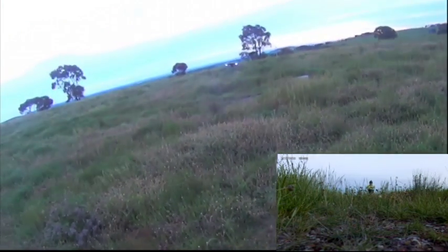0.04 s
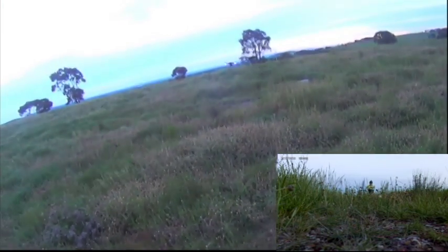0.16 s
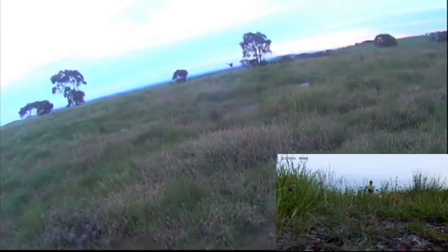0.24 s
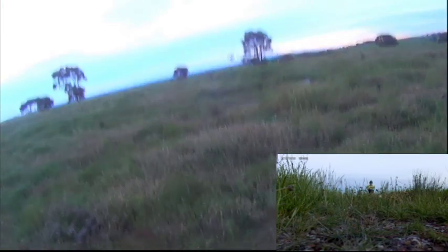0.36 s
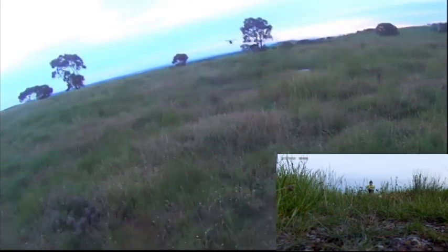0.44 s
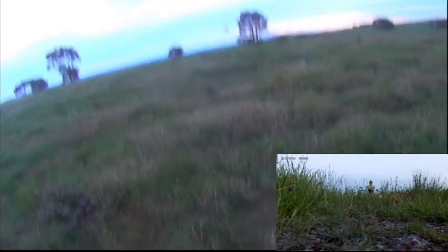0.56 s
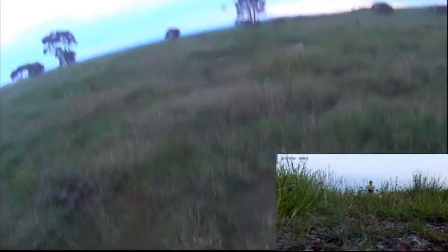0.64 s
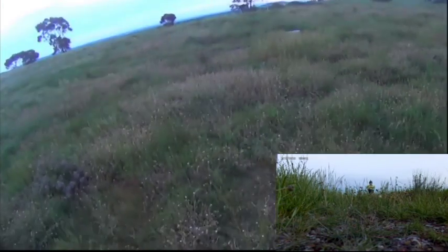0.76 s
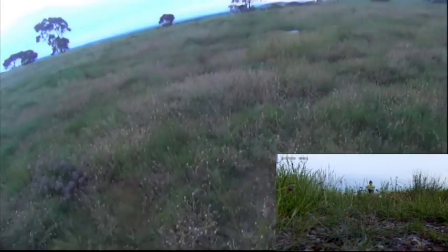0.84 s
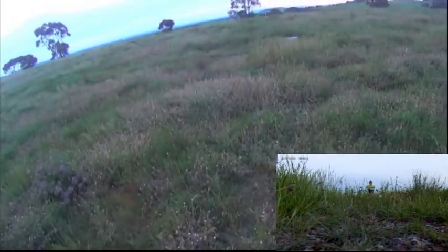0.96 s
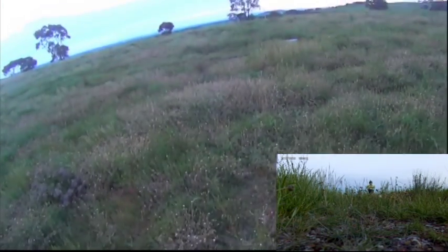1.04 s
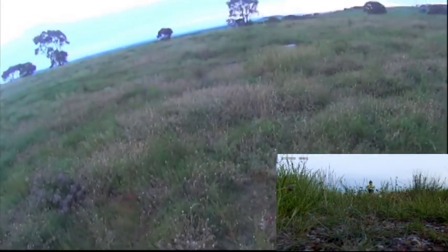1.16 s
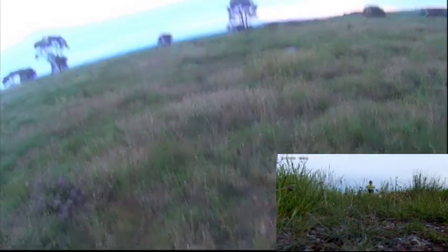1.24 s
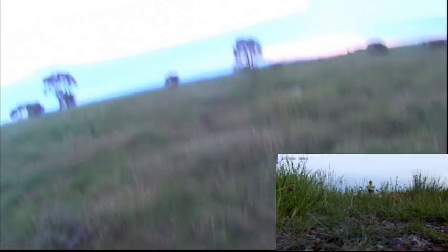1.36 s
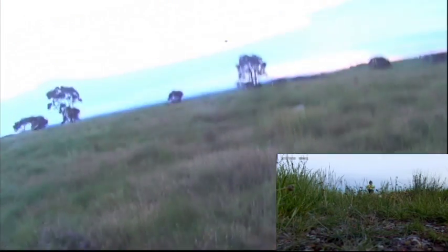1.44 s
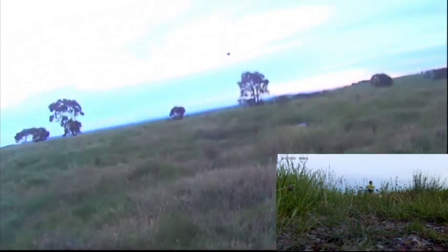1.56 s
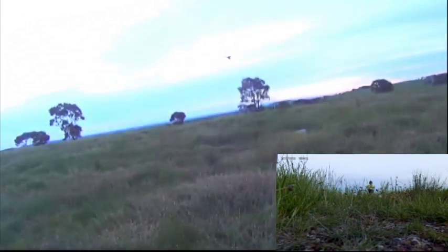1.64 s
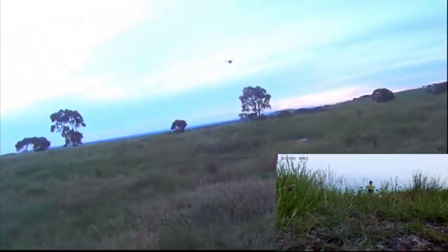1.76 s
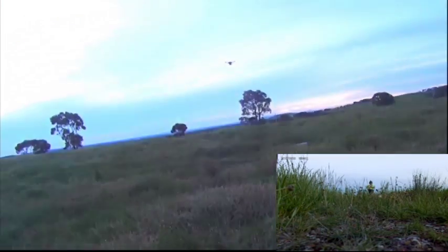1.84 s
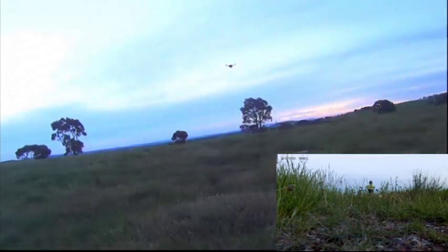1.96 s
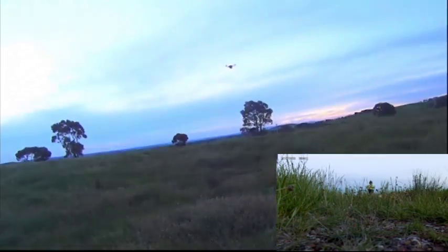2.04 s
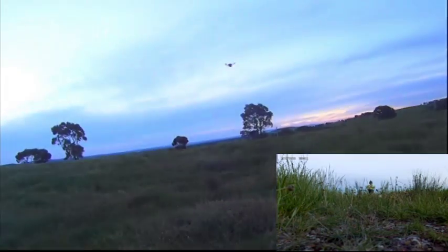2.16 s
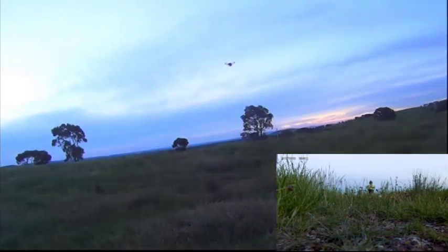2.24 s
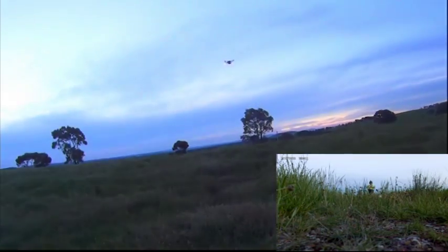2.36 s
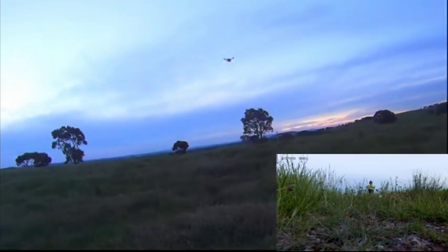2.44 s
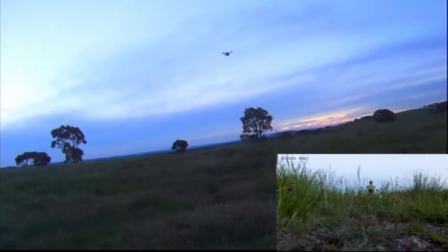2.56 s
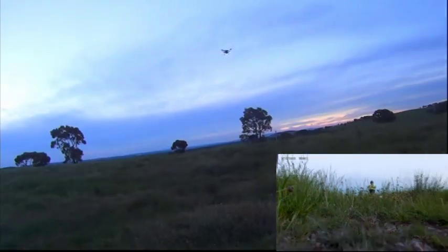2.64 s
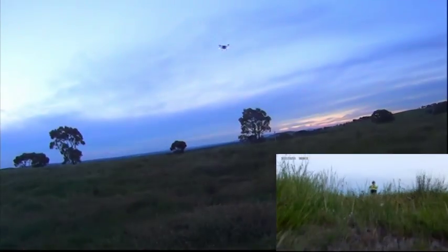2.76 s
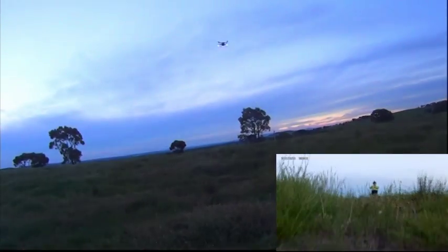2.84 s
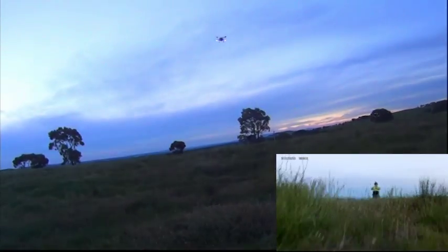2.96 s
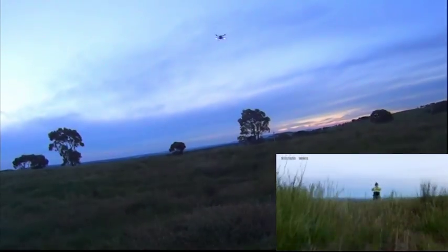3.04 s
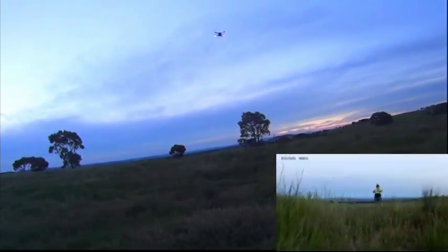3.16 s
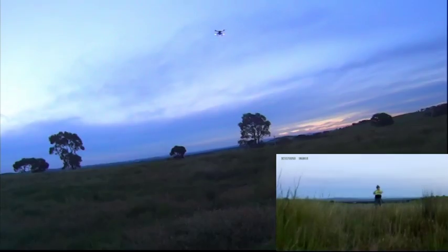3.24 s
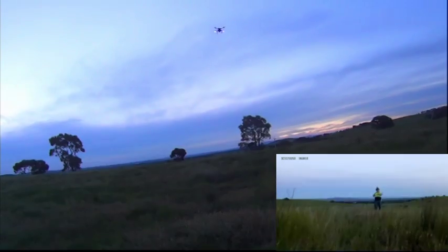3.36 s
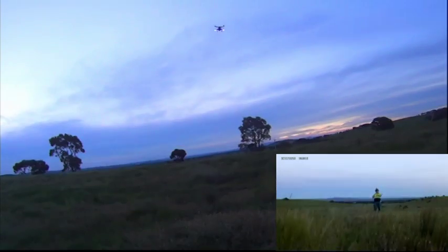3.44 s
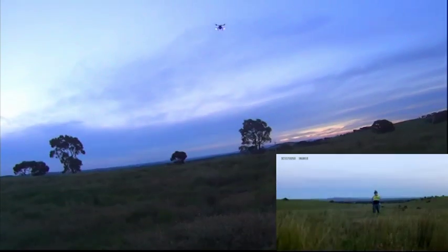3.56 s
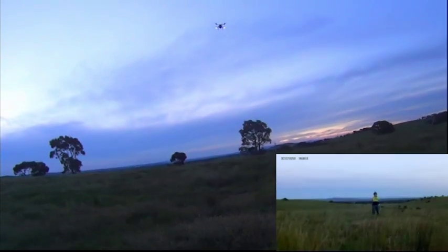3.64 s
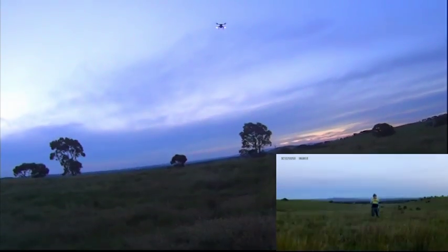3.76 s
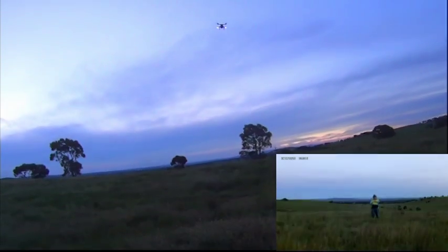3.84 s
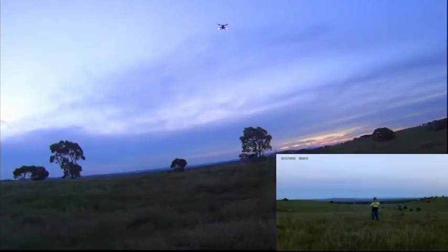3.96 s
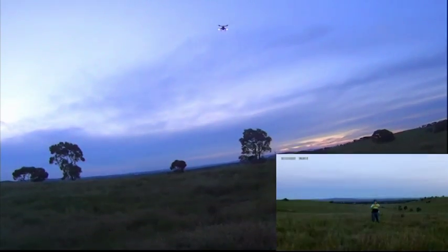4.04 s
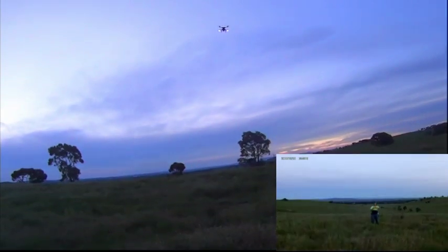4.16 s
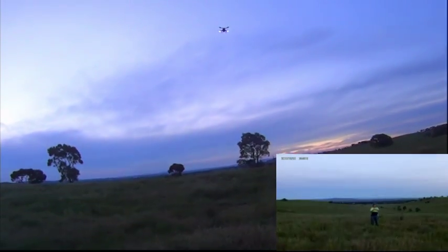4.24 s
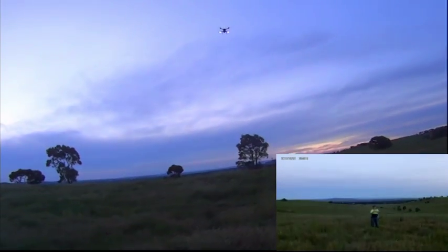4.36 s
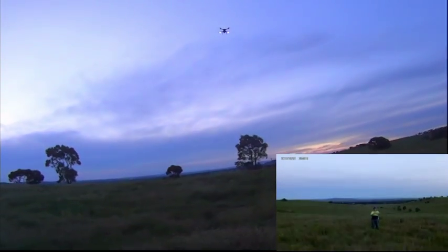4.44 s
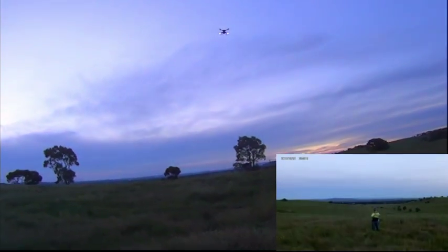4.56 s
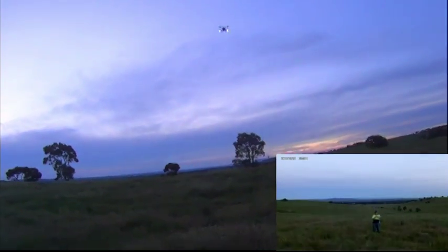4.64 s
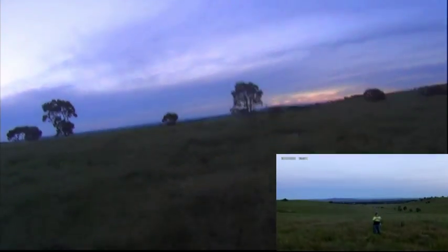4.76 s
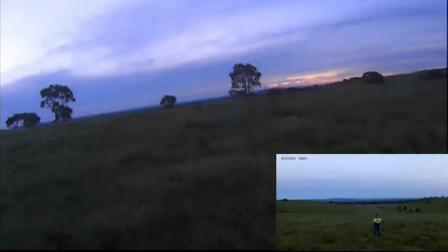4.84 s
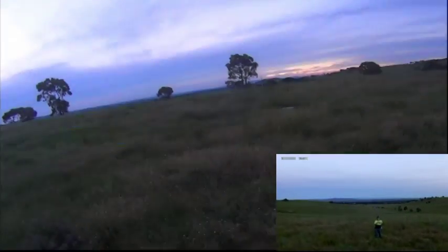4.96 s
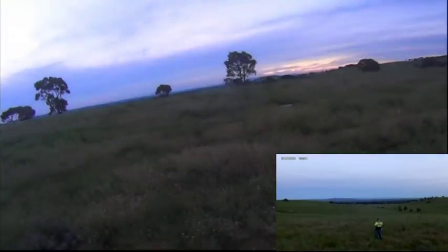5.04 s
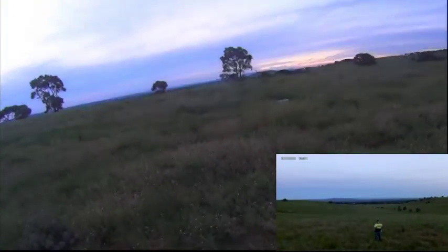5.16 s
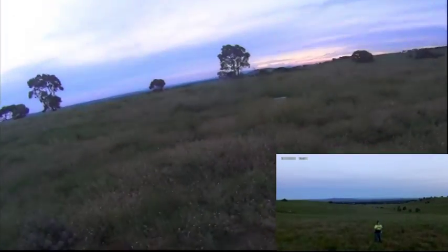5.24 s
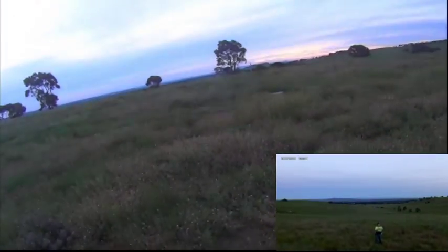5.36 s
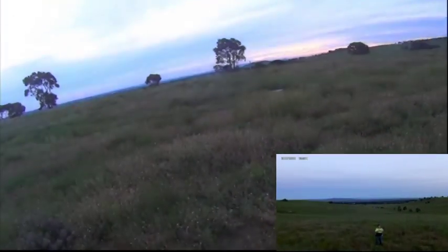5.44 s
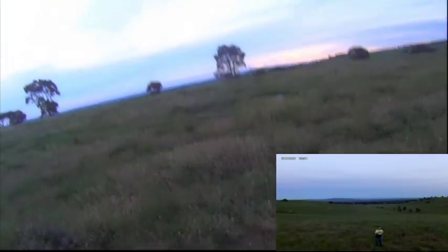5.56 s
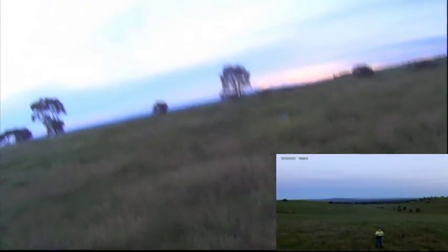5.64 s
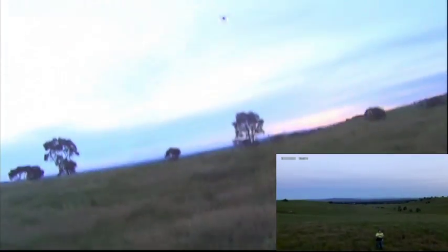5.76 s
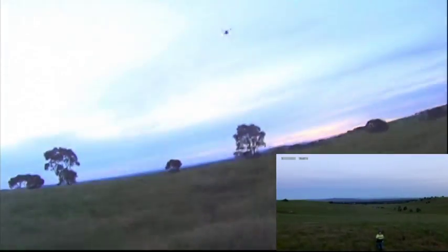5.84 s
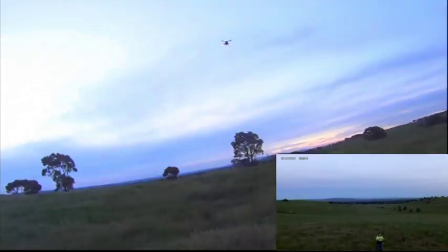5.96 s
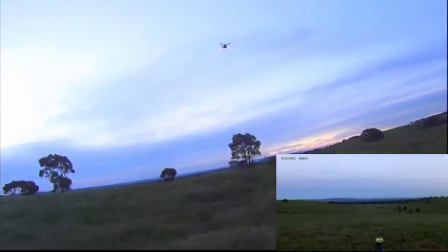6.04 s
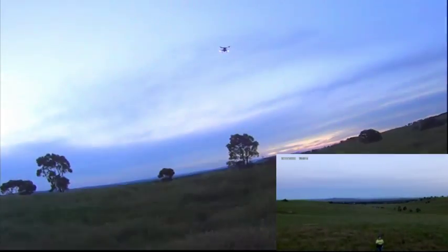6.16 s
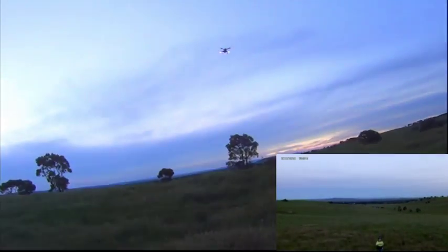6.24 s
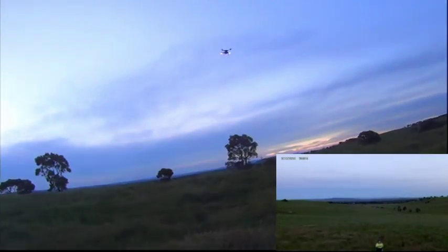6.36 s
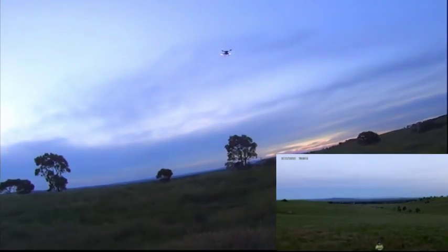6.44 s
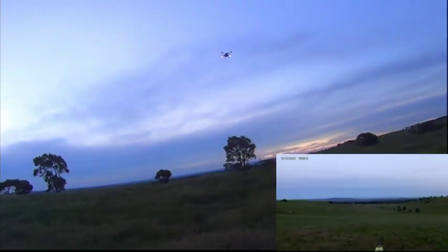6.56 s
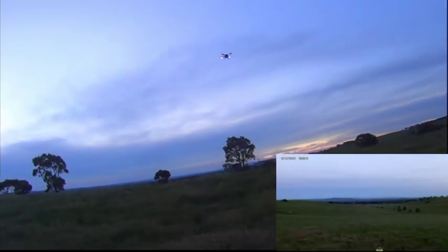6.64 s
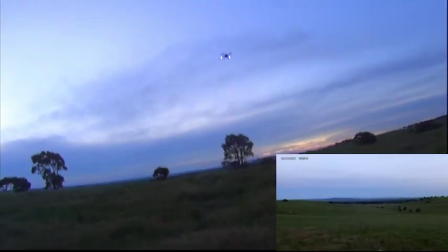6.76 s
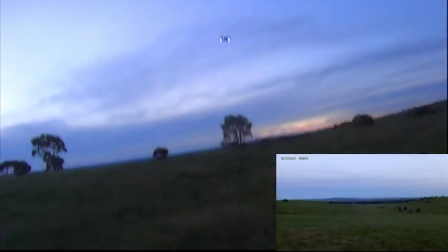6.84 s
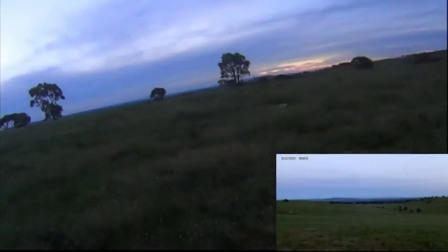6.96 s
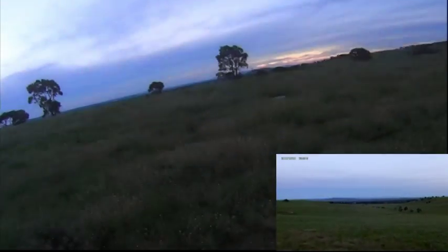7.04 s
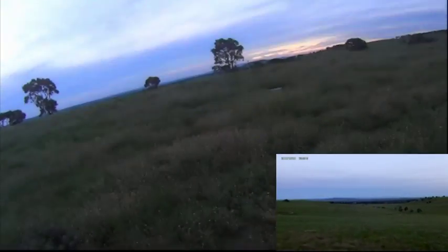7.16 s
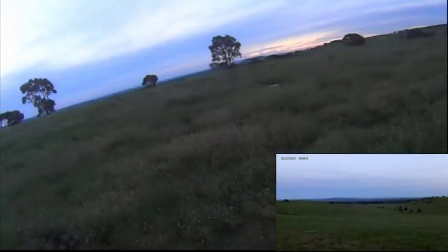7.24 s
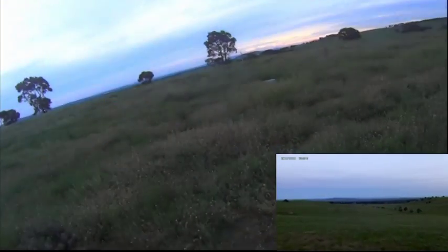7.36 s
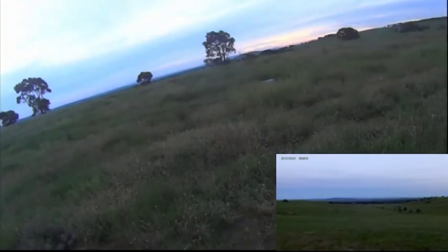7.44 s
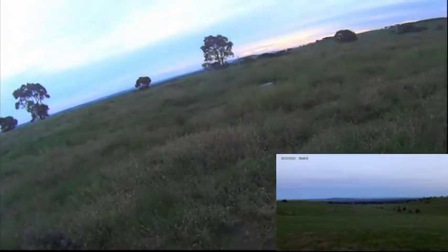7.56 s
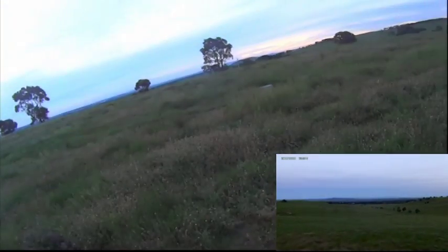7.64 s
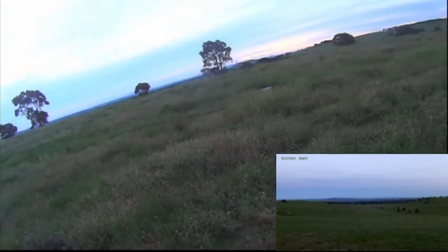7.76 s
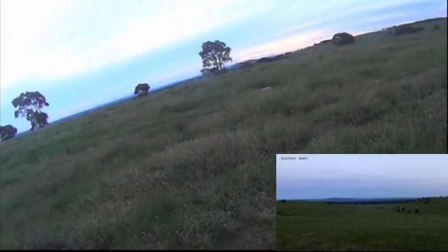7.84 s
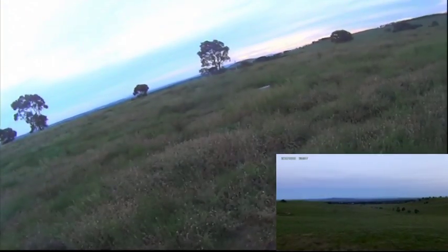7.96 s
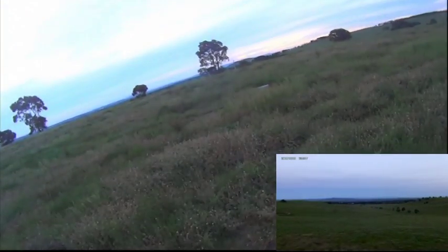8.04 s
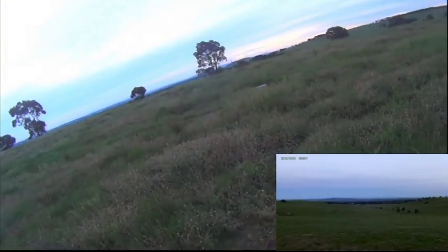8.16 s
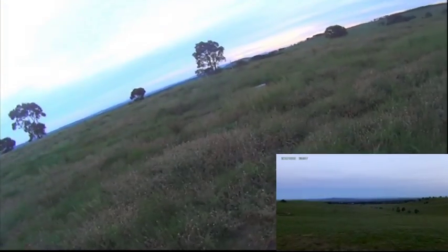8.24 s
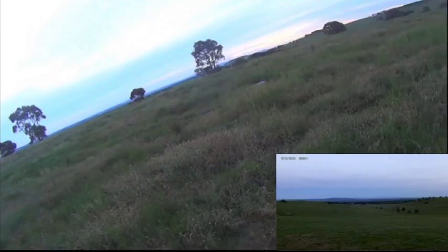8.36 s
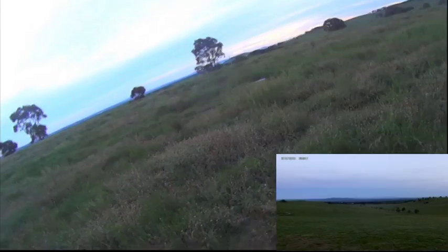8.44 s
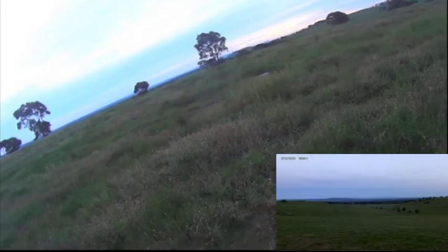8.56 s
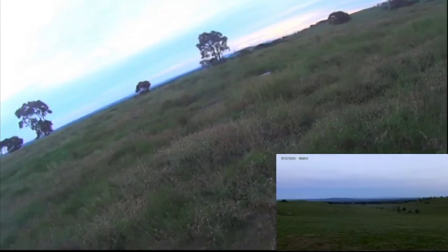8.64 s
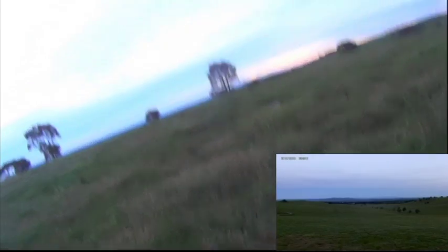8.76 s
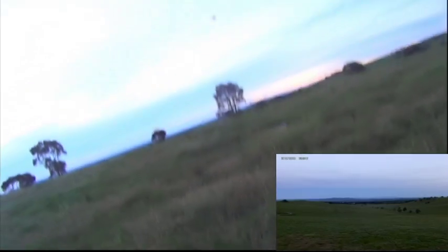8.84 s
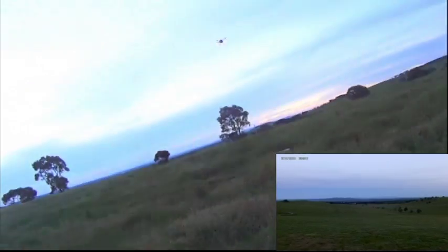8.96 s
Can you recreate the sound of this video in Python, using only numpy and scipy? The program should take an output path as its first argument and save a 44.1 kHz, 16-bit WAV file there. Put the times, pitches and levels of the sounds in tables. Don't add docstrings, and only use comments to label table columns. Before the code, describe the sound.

Outdoors, heard very close on the aircraft itself: quiet idle whine around a high steady note, shimmering slowly, with light knocks. Then an abrupt knock and rapid spin-up burst into dense propeller buzz, air roar and electric whine, slightly distorted. The four rotors waver against each other in repeated small pitch climbs, and late on the buzz drops slightly and slaps harder.

```python
import sys
import numpy as np
from scipy import signal
from scipy.fft import rfft, irfft
from scipy.io import wavfile
from scipy.ndimage import uniform_filter1d

SR = 44100
rng = np.random.default_rng(int(sys.argv[2]) if len(sys.argv) > 2 else 0)


def materialize(psi):
    bounded = np.clip(np.atleast_2d(psi).T, -1, 1)
    quanta = np.round(bounded * 32767).astype(np.int16)
    wavfile.write(sys.argv[1], SR, quanta)


def amplitude_ratio(level_db):
    exponent = np.asarray(level_db, float) / 20
    return 10 ** exponent


N = 396900
TIME = np.arange(N) / SR

# (time [s], share of trimmed speed [ratio])
SPIN_UP = [
    (2.558, .327),
    (2.59, .547),
    (2.63, .81),
    (2.7, 1),
]
# (time [s], level [dB])
WAKE_SLAP = [(7.37, 0), (7.52, 9), (7.7, 10), (8.4, 10), (8.55, 5), (9, 5)]


def rotors():
    # (time [s], four shaft speeds [turns/s])
    trimmed = [(2.7, 84.1, 85, 83.8, 79.5), (2.95, 97.6, 92.8, 85.2, 80.2), (3.15, 100.2, 92.7, 85.4, 81.4),
               (3.37, 100, 92.6, 84.5, 82), (3.62, 93, 92.5, 84.8, 81.3), (4.19, 99.5, 94, 85.3, 80.3),
               (4.85, 101, 93.1, 87.2, 77.8), (5.25, 97, 92.9, 88.8, 74.8), (5.6, 100.7, 91.9, 91.9, 76),
               (5.9, 100.9, 94.5, 93.1, 80.2), (6.4, 103, 93.4, 92.3, 80.8), (6.85, 102.7, 96.6, 89.8, 81),
               (7.25, 105, 96.8, 88.6, 79.2), (7.36, 100.6, 93.7, 86.9, 75.8), (7.48, 94.5, 92.7, 85, 73.5),
               (7.61, 88.3, 95.3, 83, 73.7), (8.3, 88.6, 96, 84.5, 74.1), (9.0, 91.4, 95.6, 85.9, 75.2)]
    tones, chop = np.zeros(N), np.zeros(N)
    racing = np.interp(TIME, [2.66, 2.76], [1, 0])
    speeds = in_time(SPIN_UP)[0] * (in_time(trimmed) + nudges())
    for motor, speed in enumerate(speeds):
        hunting = (.0025 + .018 * racing) * drift(50)
        turns = np.cumsum(speed * (1 + hunting)) / SR
        tones += blade_thrust(motor, speed, turns)
        tones += pole_whine(motor, speed, turns, racing)
        tones += racing_whine(motor, turns)
        chop += tone(2 * turns)
    return tones * np.interp(TIME, [2.559, 2.566], [0, 1]), chop / 2


def nudges():
    # (peak time [s], rise [s], fall [s], fast motor gain [turns/s], slow motor gain [turns/s])
    corrections = [(3.36, .2, .24, 0, 6.3), (3.95, .25, .11, 0, 6.2), (4.02, .45, .17, 7.6, 0),
                   (4.4, .2, .14, 6.2, 3.2), (4.665, .125, .19, 5, 4.2), (4.973, .11, .16, 6.2, 5.7),
                   (5.45, .14, .14, 8.9, 7.7), (5.75, .16, .17, 5.5, 5), (5.86, .08, .07, 0, 2.5),
                   (6.01, .09, .075, 2.8, 2.4), (6.23, .16, .15, 4, 5.2), (6.49, .1, .12, 3.4, 2.3),
                   (6.7, .15, .13, 1.9, 0), (7.02, .16, .28, 3.2, 3.4)]
    extra = np.zeros((4, N))
    for s, rise, fall, *sizes in corrections:
        ramp = np.interp(TIME, [s - rise, s, s + fall], [0, 1.4, 0])
        extra[:2] += np.outer(sizes, np.minimum(ramp, 1))
    return uniform_filter1d(extra, size=1300)


def blade_thrust(motor, speed, turns):
    # (overtone [number], four levels [dB])
    blade_tones = [(1, -6, -5, -4, 0), (2, -10, -6, -8, -6), (3, 0, -1, 0, -16), (4, -8, 0, -5, -14),
                   (5, -7, 1, -7, -12), (6, -7, -5, -3, -10), (7, -7, 0, -3, -12), (8, -7, -6, -3, -10),
                   (9, -8, -11, -4, -10), (10, -7, -3, -3, -10)]
    # (level [dB], reference speed [turns/s])
    blade_load = [(-31.5, 100.3), (-34, 96.7), (-40.5, 88), (-38.5, 80.4)]
    # (time [s], level [dB])
    lean_back = [(5.4, -2), (5.75, 4), (6.6, 4), (7.1, 0), (7.3, 10), (8.2, 12), (8.65, 11.5), (8.8, 0)]
    reference_db, reference_speed = blade_load[motor]
    load_db = reference_db + 20 * 4.0 * np.log10(speed / reference_speed) + 1.0 * drift(2.3)
    load_db += in_time(lean_back)[0] * (motor == 3)
    slap_db = in_time(WAKE_SLAP)[0] * (motor == 1)
    bite_db = 11 * np.exp(-((TIME - 2.7) / .14) ** 2)
    out = np.zeros(N)
    for overtone, *motor_db in blade_tones:
        level_db = load_db + motor_db[motor] + 1.6 * drift(14)
        level_db += slap_db * (overtone > 5) + bite_db * (overtone == 1)
        out += amplitude_ratio(level_db) * tone(2 * overtone * turns)
    return out


def pole_whine(motor, speed, turns, racing):
    # (frequency [Hz], level [dB])
    whine_path = [(1150, -28), (1930, -25.5), (2860, -27), (3530, -35), (3900, -28), (4300, -29),
                  (4460, -41), (4540, -35)]
    # (frequency [Hz], level [dB])
    upper_path = [(5000, -44), (5500, -40), (5700, -35.5), (5950, -29.5)]
    motor_db = (-.5, -.3, -7, -8)
    whine_db = at_hz(whine_path, 42 * speed) + motor_db[motor] + 1.3 * drift(15)
    whine_db -= in_time(WAKE_SLAP)[0] * (1 if motor == 1 else .5)
    upper_db = at_hz(upper_path, 56 * speed) if motor == 0 else whine_db - 9
    current_db = np.clip(.13 * uniform_filter1d(np.gradient(speed) * SR, size=1500), -4, 3)
    current_db += racing * (4 * drift(150) - 80 * np.maximum(TIME - 2.625, 0))
    out = np.zeros(N)
    for multiple, level_db in ((42, whine_db + 1.8), (56, upper_db + 3), (54, upper_db - 1)):
        out += amplitude_ratio(level_db + current_db + 1.3 * drift(40)) * tone(multiple * turns)
    return out


def racing_whine(motor, turns):
    # (time [s], level [dB])
    race_up = [(2.56, -45), (2.58, -32), (2.592, -19), (2.602, -23), (2.62, -33), (2.64, -36), (2.67, -60)]
    return amplitude_ratio(in_time(race_up)[0] - 3 * motor) * tone(84 * turns) * (TIME < 2.67)


def wash(chop):
    # (time [s], level [dB])
    effort = [(2.56, -22.5), (2.65, -13), (2.72, -7.5), (3.14, -6.5), (3.21, -12), (3.28, -10), (3.46, -15),
              (3.85, -15), (4.0, -12), (4.27, -15), (4.5, -15), (5.2, -14), (5.69, -13), (7.67, -13),
              (8.64, -11), (9.0, -9.5)]
    # (frequency [Hz], level [dB])
    wash_air = [(20, -39), (60, -27), (90, -20), (250, -9.5), (500, -7.5), (900, -2), (1400, 1.5),
                (2000, -3), (3100, -11), (5000, -9.5), (7000, -7), (9000, -13), (10800, -13.5),
                (16000, -24)]
    level_db, = in_time(effort)
    above_hover_db = level_db + 13.5
    treble_db = -17 + 0.6 * above_hover_db + 0.03 * nudges().sum(axis=0)
    treble_db -= .3 * (TIME - 3)
    stirred_db = 40 * 2.8 * np.log10(in_time(SPIN_UP)[0])
    headwind_db = 2 * np.clip(TIME - 3, 0, 5.0)
    bass_db = -33.5 + headwind_db + 1.5 * drift(9) + stirred_db
    rumble_db = -35 + 1.5 * drift(4.8) + stirred_db
    gust = drift(60)
    white = rng.standard_normal((3, N))
    lows = coloured(white[0] * amplitude_ratio(2.5 * drift(120)), wash_air)
    middle = coloured(white[1] * amplitude_ratio(0.88 * chop + 0.41 * gust), wash_air)
    treble = coloured(white[2] * amplitude_ratio(1.43 * chop + 1.0 * gust + 0.37 * drift(300)), wash_air)
    air = amplitude_ratio(level_db) * band(middle, 464, 3050)
    air += amplitude_ratio(treble_db) * band(treble, 3520, 13700)
    air += amplitude_ratio(bass_db) * band(lows, 74, 396)
    air += amplitude_ratio(rumble_db) * band(lows, 24, 125)
    air += grass_rasp()
    arms_db = -33.5 + 2.6 * above_hover_db - 1.3 * (TIME - 3.5)
    air += amplitude_ratio(arms_db) * band(treble, 3550, 4070)
    return air * np.interp(TIME, [2.555, 2.565], [0, 1])


def grass_rasp():
    since_peak = TIME - 2.64
    fall_db = np.maximum(20.5 * since_peak, -200 * since_peak)
    return amplitude_ratio(-22.5 - fall_db) * band(rng.standard_normal(N), 6000, 15200)


def ground_echo(x):
    # (time [s], echo lag [ms], echo share [ratio])
    ground = [(2.55, 1.1, .3), (2.8, 1.0, .45), (2.845, .95, .0), (2.855, .38, .0), (2.88, .39, .9),
              (3.03, .66, .8), (3.08, .9, .6), (3.11, .5, .45), (3.35, .5, .0)]
    lag_ms, share = in_time(ground)
    late = np.interp(TIME - lag_ms / 1000, TIME, x)
    late = signal.filtfilt([.45], [1, -.55], late)
    return (x + share * late) / np.sqrt(1 + share ** 2 / 2)


def knocks():
    # (time [s], level [dB], frequency [Hz], 60 dB decay [s])
    touches = [
        (.42, -42, 30, .15),
        (1.350, -33, 330, .06),
        (1.364, -32, 400, .05),
        (1.364, -37, 76, .2),
        (2.562, -16, 630, .11),
        (2.567, -17, 1280, .045),
        (2.562, -24, 5850, .08),
    ]
    out = np.zeros(N)
    for s, db, hz, t60 in touches:
        age = np.maximum(TIME - s, 0)
        soft_start = 1 - np.exp(-age * hz * 2)
        out += amplitude_ratio(db - 60 * age / t60) * soft_start * np.sin(2 * np.pi * hz * age)
    return out


def idle():
    # (time [s], whine frequency [Hz], level [dB])
    idle_whine = [(0.0, 1130, -39), (0.03, 1136, -34), (0.92, 1167, -34), (1.99, 1175, -35),
                  (2.27, 1162, -33.5), (2.55, 1160, -34.5)]
    # (time [s], offset [Hz], level [dB], offset [Hz], level [dB])
    idle_others = [(0, 17.5, -8, 43.3, -9), (.5, 14.5, -14, 44.9, -14), (.95, 15, -6.5, 29.9, -19),
                   (1.25, -6.5, -16, 31.1, -13), (1.55, -4.5, -19, 29.75, -19),
                   (1.85, -14.5, -8, 28, -18.5), (2.1, -7, -8, 30.1, -22), (2.55, -12, -7.5, 45.3, -11)]
    # (frequency [Hz], level [dB])
    idle_air = [(15, -31), (60, -28), (110, -13.5), (300, -13), (600, -2), (1200, 3), (2000, -4.5),
                (3300, -9), (5050, -16), (6300, -12.5), (7000, -16.5), (9600, -15.5), (11500, -27),
                (14600, -21.5), (16000, -9.5)]
    hz, db = in_time(idle_whine)
    off1, db1, off2, db2 = in_time(idle_others)
    out = amplitude_ratio(-34 + .6 * drift(24.4)) * coloured(rng.standard_normal(N), idle_air)
    for off, rel_db in ((0, 0), (off1, db1), (off2, db2)):
        turns = np.cumsum(hz + off + 2.07 * drift(12)) / SR
        out += amplitude_ratio(db + rel_db + 1.0 * drift(30.6)) * tone(turns)
    out += idle_rings(hz)
    out += amplitude_ratio(-66 + 3.0 * drift(5.2)) * band(rng.standard_normal(N), 22.0, 75.0)
    return out * np.interp(TIME, [2.56, 2.6], [1, 0])


def idle_rings(whine_hz):
    # (frequency [Hz], width [Hz], rms level [dB])
    ring_modes = [(834, 1.5, -50.5), (1028, 8, -51), (2401, 12, -58), (2650, 60, -60), (3990, 350, -52),
                  (5410, 12, -63), (5790, 220, -49.5), (9730, 350, -66), (11359, 4, -77), (11429, 4, -76)]
    out = np.zeros(N)
    for mid, width, ring_db in ring_modes:
        if width > 10:
            r, w = np.exp(-np.pi * width / SR), 2 * np.pi * mid / SR
            poles = [1, -2 * r * np.cos(w), r * r]
            ring = rms_one(signal.lfilter([1, 0, -1], poles, rng.standard_normal(N)))
        else:
            ring_hz = mid * whine_hz / whine_hz.mean() + width / 2 * drift(12)
            ring = tone(np.cumsum(ring_hz) / SR)
        out += amplitude_ratio(ring_db) * ring
    return out


def tone(turns):
    return np.sqrt(2) * np.sin(2 * np.pi * (turns + rng.random()))


def drift(rate):
    knots = rng.standard_normal(4000)
    return np.interp(TIME * rate, np.arange(4000), knots) * 1.157


def coloured(x, spectrum):
    # (frequency [Hz], width [Hz], level [dB])
    housing = [(2560, 290, 4.5), (3980, 1390, 7.5), (5690, 1630, 6.5), (6090, 530, -4.5), (8000, 486, -38),
               (10960, 520, 4.5), (13100, 340, -22), (14480, 970, 14.5)]
    hz = np.fft.rfftfreq(N, 1 / SR) + 1
    db = at_hz(spectrum, hz) + peaks_db(housing, hz)
    return rms_one(irfft(rfft(x) * amplitude_ratio(db), N))


def peaks_db(modes, hz):
    return sum(db / (1 + ((hz - mid) / (width / 2)) ** 2) for mid, width, db in modes)


def band(x, low_hz, high_hz):
    sos = signal.butter(2, [low_hz, high_hz], "band", fs=SR, output="sos")
    return rms_one(signal.sosfilt(sos, x))


def at_hz(points, hz):
    points = np.array(points)
    return np.interp(np.log(hz), np.log(points[:, 0]), points[:, 1])


def in_time(rows):
    s, *columns = np.transpose(rows)
    return [np.interp(TIME, s, c) for c in columns]


def rms_one(x):
    return x / np.sqrt(np.mean(x ** 2) + 1e-20)


def scene():
    tones, chop = rotors()
    return (tones + ground_echo(wash(chop)) + knocks() + idle())[None, :]


def roll_off(x):
    return signal.sosfilt(signal.butter(12, 16320, fs=SR, output="sos"), x)


def record(dry):
    flat = dry / (1 + np.abs(dry / .46) ** 6.0) ** (1 / 6.0)
    hz = np.fft.rfftfreq(N, 1 / SR)
    dull = (hz < 15600) / np.sqrt(1 + (hz / 10000) ** 4)
    return roll_off(irfft(rfft(flat) * dull, N) + .0023)


dry = scene()
out = record(dry)
materialize(out)
```